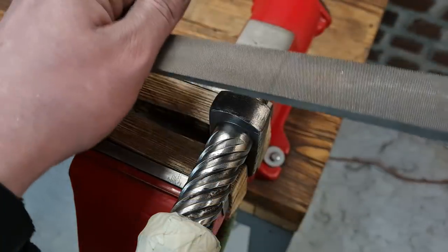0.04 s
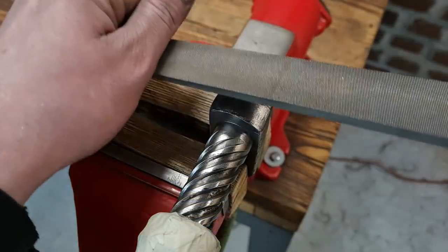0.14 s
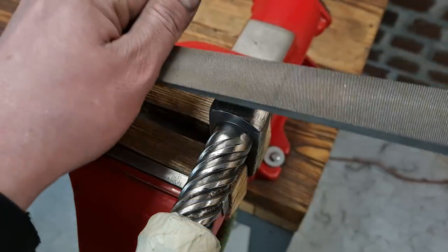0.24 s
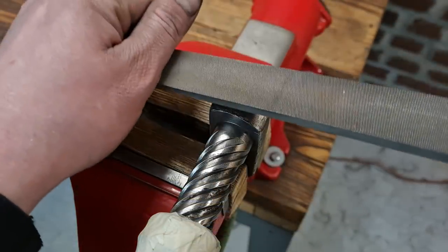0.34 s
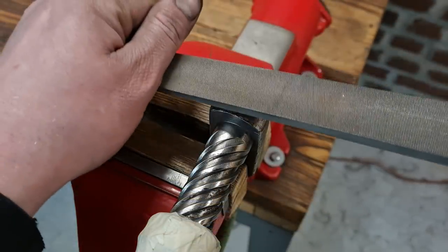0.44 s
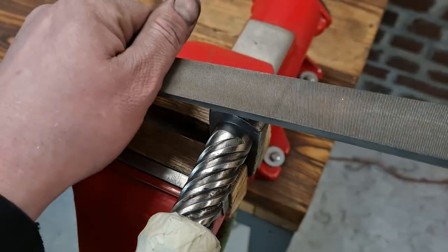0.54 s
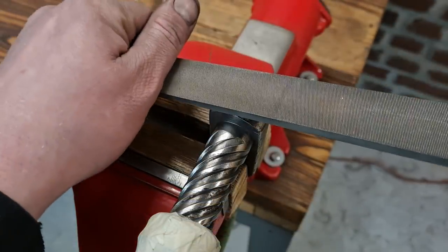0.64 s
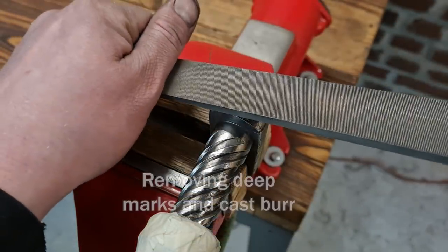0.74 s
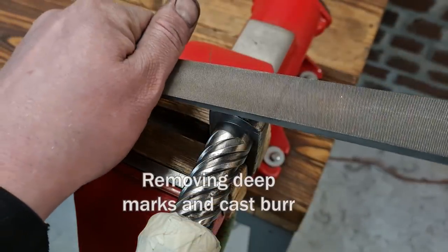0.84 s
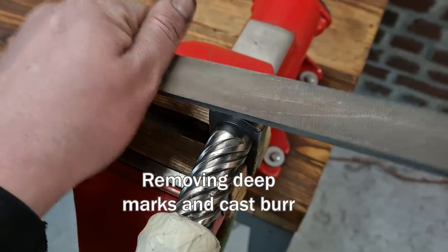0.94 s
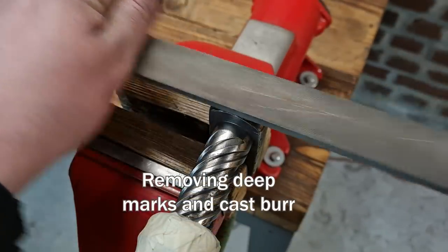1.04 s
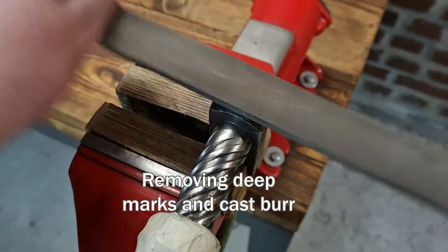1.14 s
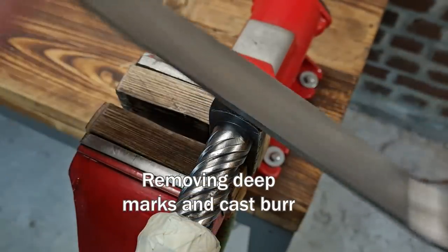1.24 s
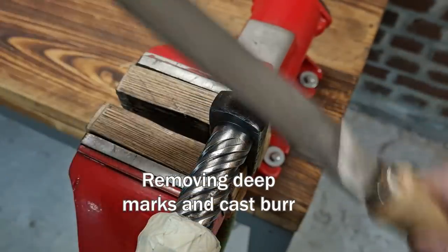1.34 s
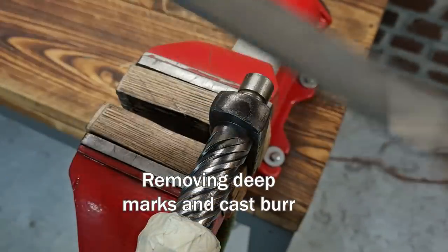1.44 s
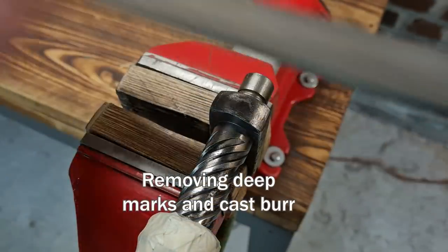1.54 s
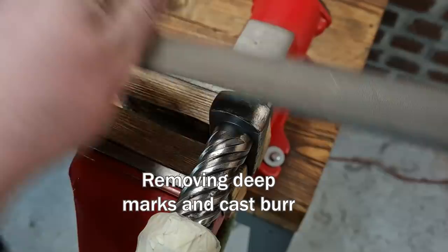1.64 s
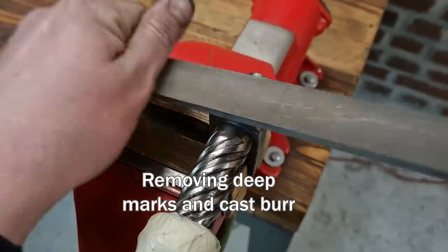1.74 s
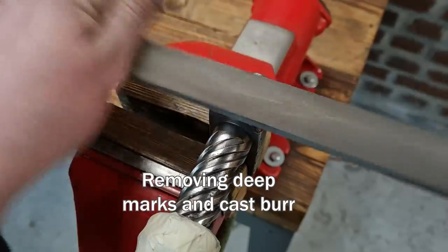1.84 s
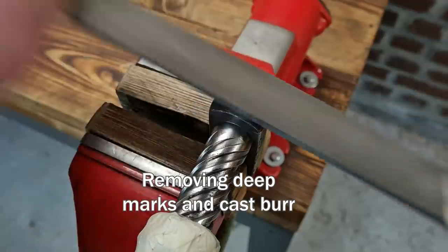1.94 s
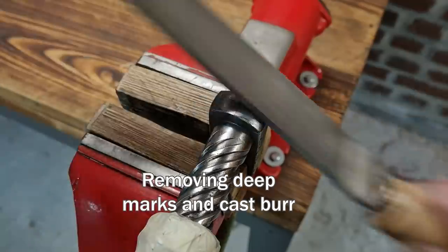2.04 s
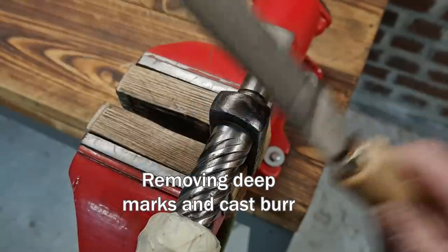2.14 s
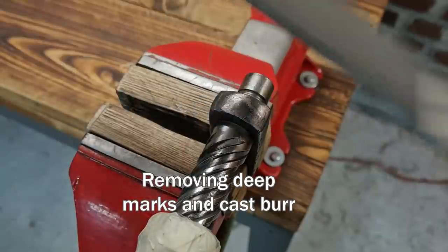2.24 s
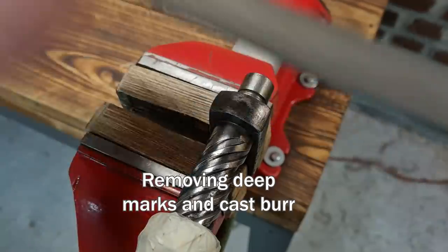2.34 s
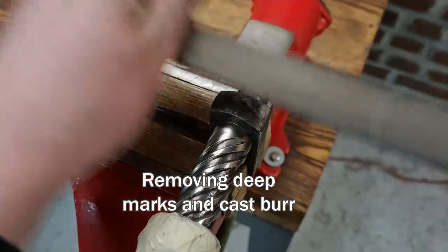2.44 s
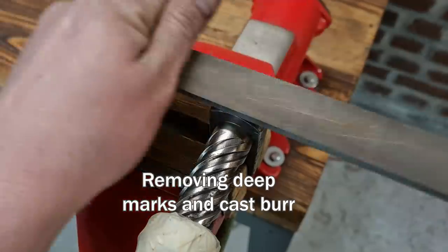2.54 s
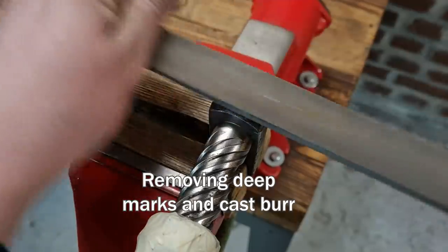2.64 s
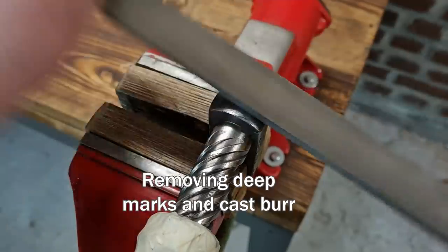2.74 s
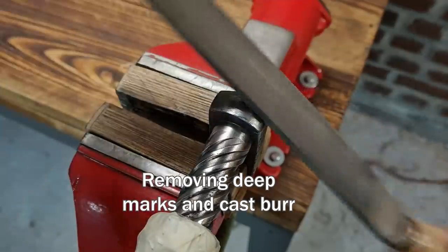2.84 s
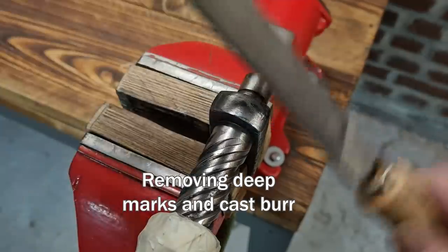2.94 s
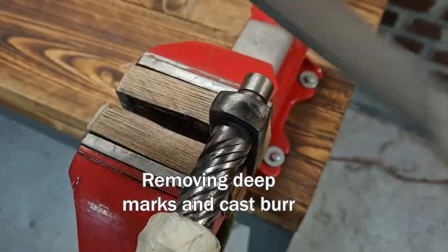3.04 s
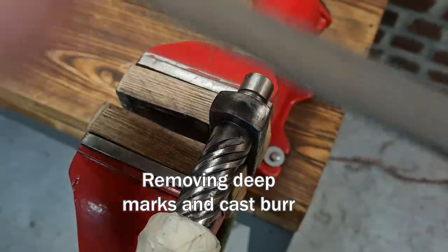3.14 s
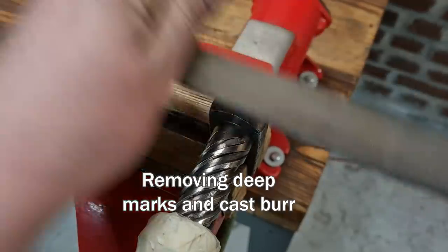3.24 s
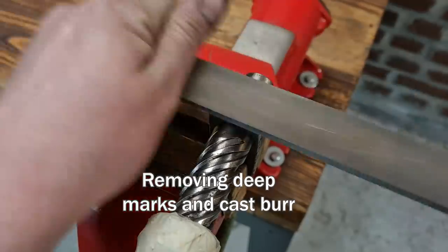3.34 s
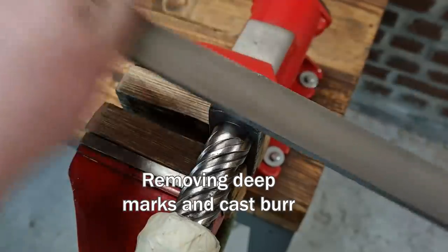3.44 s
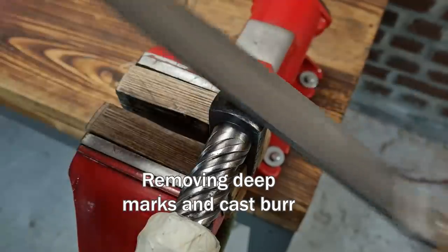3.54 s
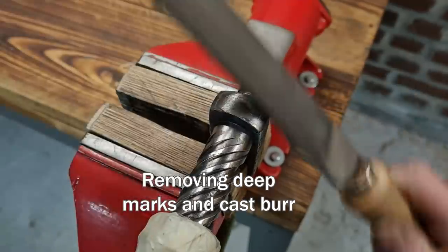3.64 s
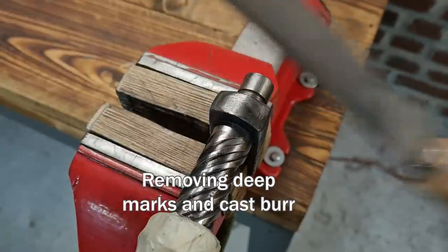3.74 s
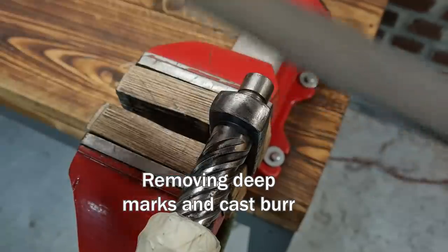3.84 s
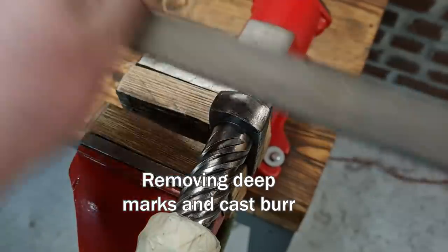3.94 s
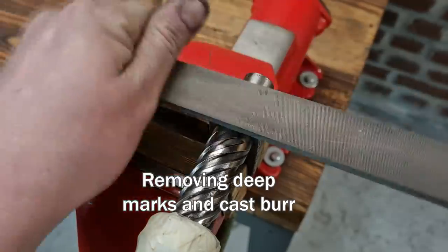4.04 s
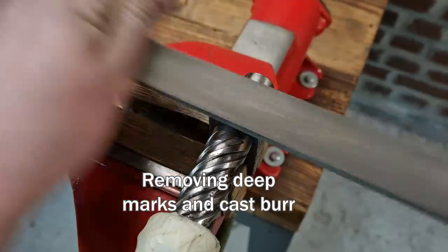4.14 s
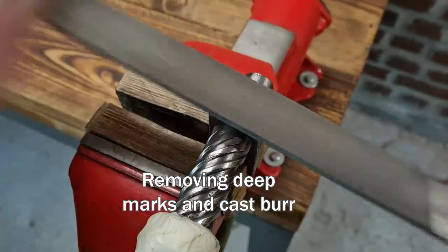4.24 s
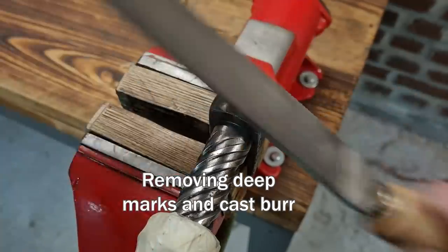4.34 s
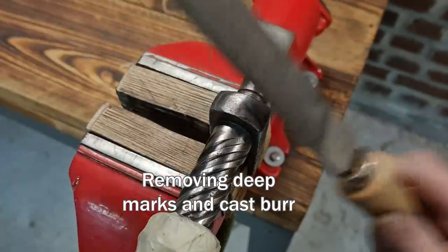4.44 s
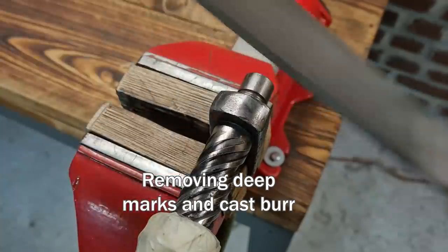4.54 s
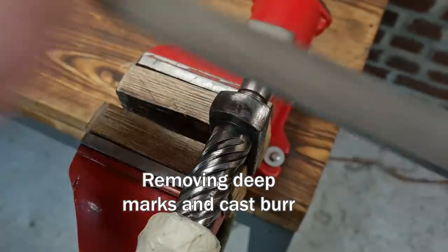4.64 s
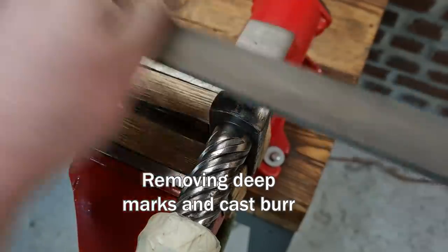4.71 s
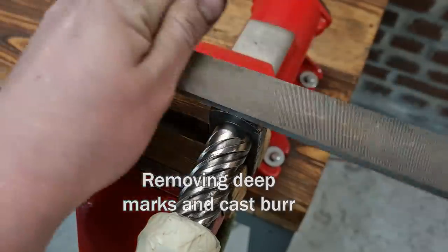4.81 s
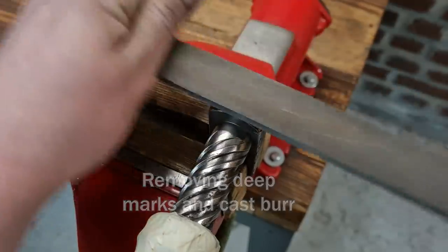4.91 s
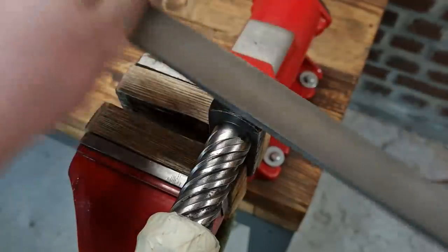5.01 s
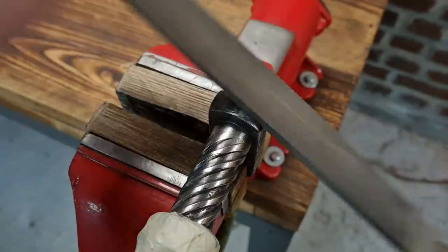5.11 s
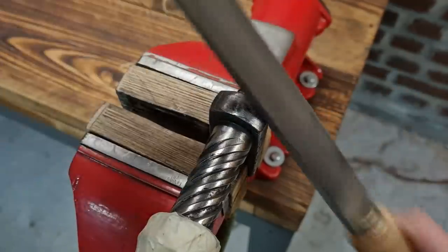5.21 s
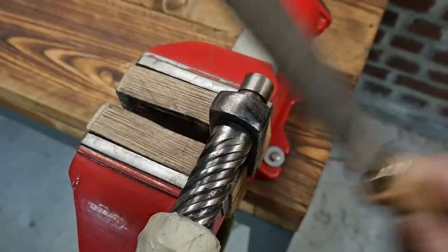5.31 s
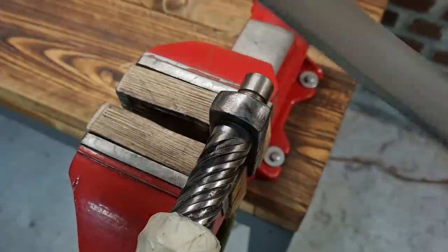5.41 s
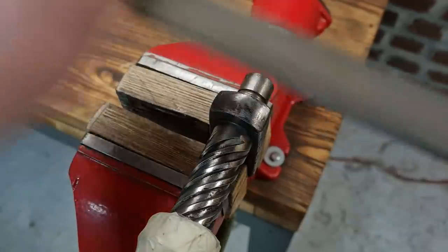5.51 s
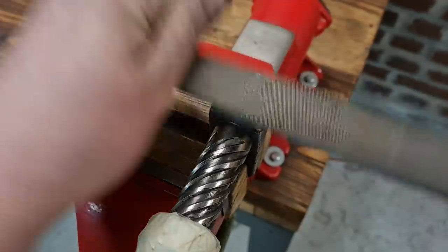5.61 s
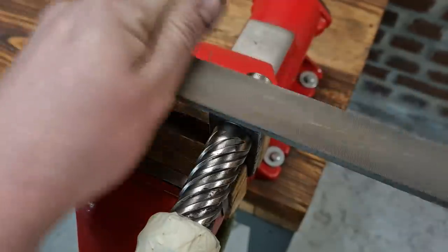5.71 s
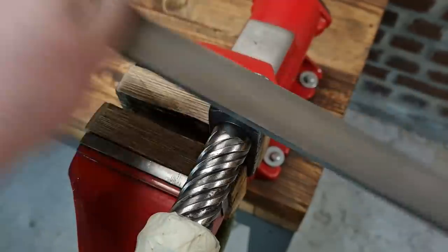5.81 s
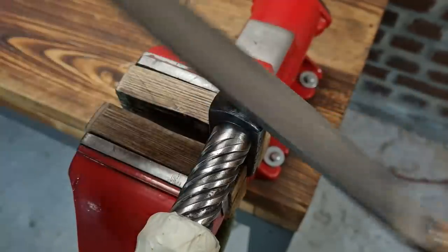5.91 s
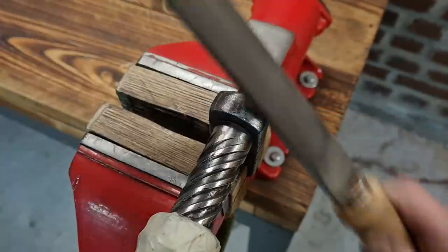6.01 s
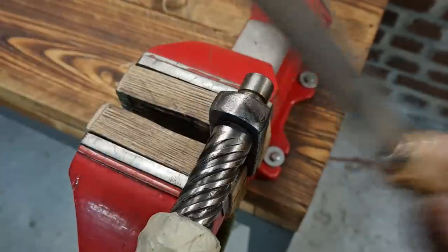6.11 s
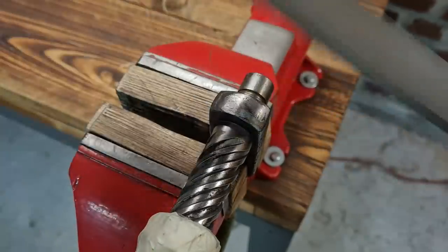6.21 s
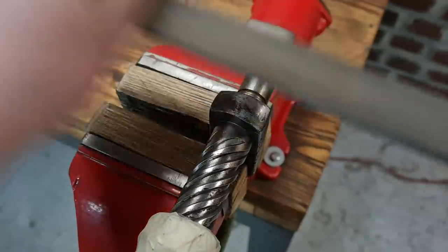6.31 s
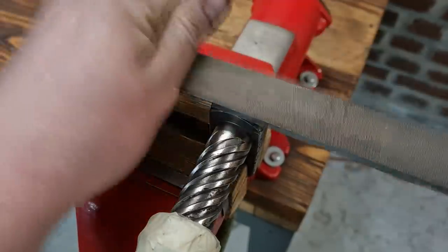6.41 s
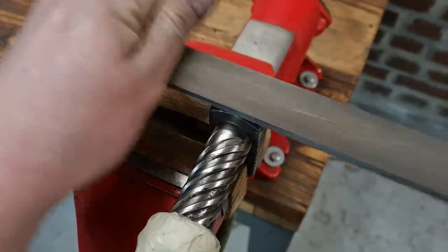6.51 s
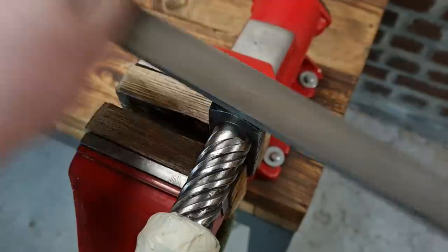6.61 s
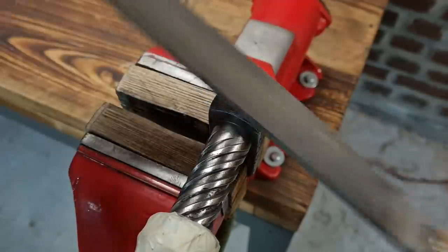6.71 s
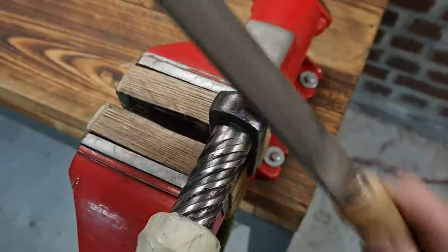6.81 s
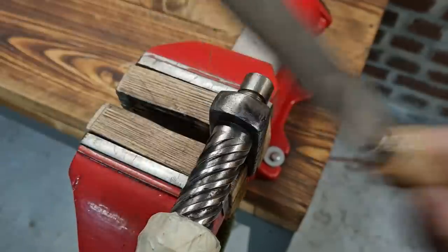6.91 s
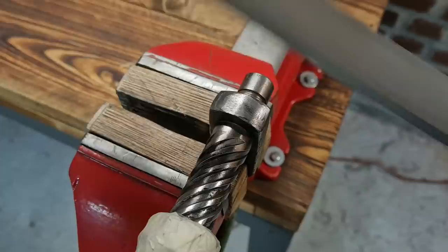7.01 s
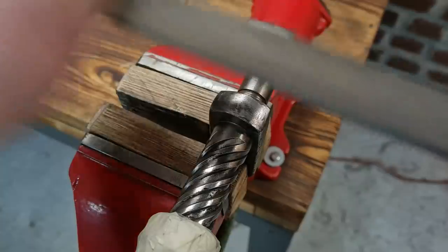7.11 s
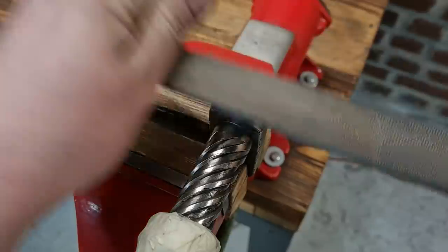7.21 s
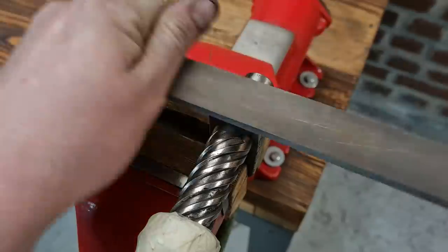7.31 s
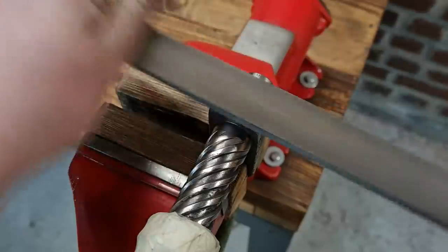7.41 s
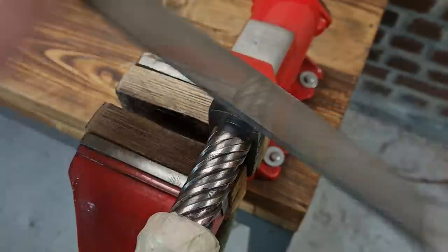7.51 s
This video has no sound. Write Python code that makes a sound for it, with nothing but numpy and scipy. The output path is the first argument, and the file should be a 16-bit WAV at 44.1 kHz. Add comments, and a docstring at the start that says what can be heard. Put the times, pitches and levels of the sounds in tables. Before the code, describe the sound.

Nine gritty filing strokes on steel in a bench vise, most starting with a hard metallic clack, with short gaps and a faint room tail.

```python
"""In a small workshop, a flat hand file works a steel part held between wooden jaws in a bench vise.
The file is set down, then stroked nine times: each later stroke lands with a sharp clack (noise and damped sines).
Forward strokes rasp: tooth-modulated noise drives resonances of bench, part and blade, plus a hiss of chips.
As the contact travels along the blade at an even pace, bending-wave nodes sweep dark notches down through
the rasp while its resonances climb; after each lift-off the file rings on, and the room answers."""
import sys
import numpy as np
from scipy import signal
from scipy.fft import rfft, irfft, next_fast_len
from scipy.io import wavfile
from scipy.ndimage import uniform_filter1d, map_coordinates

SR = 44100
rng = np.random.default_rng(int(sys.argv[2]) if len(sys.argv) > 2 else 0)


def wav_out(sig):
    """Save sig, one row per channel (or a flat mono array), as 16-bit PCM at SR to the path in sys.argv[1]."""
    wavfile.write(sys.argv[1], SR, np.round(np.clip(np.atleast_2d(sig).T, -1, 1) * 32767).astype(np.int16))


N = 333396
TIME = np.arange(N) / SR


def amp(db):
    """Decibels to gain."""
    return 10 ** (np.asarray(db) / 20)


def unit(x):
    """Scale to rms 1."""
    return x / np.sqrt(np.mean(x ** 2) + 1e-20)


def along(points, hz):
    """Interpolate (f/Hz, value) points on a log frequency axis."""
    f, value = np.transpose(points)
    return np.interp(np.log(hz + 1), np.log(f + 1), value)


def fade(t, t60):
    """Exponential decay by 60 dB in t60 seconds."""
    return np.exp(-np.log(1000) * t / t60)


def swell_at(s, span):
    """A smooth bump around s seconds, down to 1/e at span seconds either side."""
    return np.exp(-((TIME - s) / span) ** 2)


def wobble(rate):
    """A smooth random curve with rate knots a second."""
    knots = rng.standard_normal(int(N * rate / SR) + 4)
    return map_coordinates(knots, [TIME * rate])


def filtered(x, response, keep_power=False):
    """Filter x by a complex response of frequency, optionally normalised to equal power for white noise."""
    size = next_fast_len(N + SR // 2)
    h = response(np.fft.rfftfreq(size, 1 / SR))
    if keep_power:
        h = h / np.sqrt(np.mean(abs(h) ** 2))
    return irfft(rfft(x, size) * h, size)[..., :N]


def coloured(x, spectrum):
    """Give white sound a spectrum at equal power."""
    return filtered(x, lambda hz: amp(along(spectrum, hz)), True)


def resonate(x, modes):
    """Drive parallel (f/Hz, width/Hz, level/dB) resonances of alternating sign at equal power."""
    def response(f):
        total = 0
        for k, (centre, width, db) in enumerate(modes):
            band = 1j * f * width / (centre * centre - f * f + 1j * f * width)
            total = total + (-1) ** k * amp(db) * band
        return total
    return filtered(x, response, True)


def ring(modes, t, scatter_db):
    """Sum damped sines, with new strengths and signs for every blow."""
    hz, db, t60 = np.transpose(modes)[:, :, None]
    sign = rng.choice([-1, 1], hz.shape)
    size = sign * amp(db + scatter_db * rng.standard_normal(hz.shape))
    return np.sum(size * np.sin(2 * np.pi * hz * t) * fade(t, t60), axis=0)


def add(track, s, sound):
    """Mix a sound into a track at s seconds."""
    part = track[..., round(s * SR):][..., :sound.shape[-1]]
    part += sound[..., :part.shape[-1]]


# spectrum of the workshop hush: (f/Hz, relative level/dB)
HUSH = [(25, -6.5), (60, -10.5), (150, -12), (320, 1.5), (800, -27), (1500, -17.5), (4000, -28.5),
        (6500, -19), (16000, -29.5)]


def workshop_hush(level_db=-79.0):
    """Steady coloured noise, partly shared by both microphones."""
    shared = rng.standard_normal(N)
    return amp(level_db) * coloured(shared + .5 * rng.standard_normal((2, N)), HUSH)


# decay of the workshop: (f/Hz, t60/s before the early boost)
WORKSHOP = [(60, 0.93), (250, 0.64), (700, 0.45), (1500, 0.36), (4000, 0.31), (8000, 0.32), (15000, 0.24)]


def room(x, gap=.006, early_db=9, early_s=0.0044):
    """Bench top and near walls answer first; each stroke gets its own diffuse, frequency-dependent tail."""
    out = np.zeros((2, N))
    # a new tail takes over 30 ms before each stroke
    edges = [0] + [round((stroke[0] - .03) * SR) for stroke in STROKES] + [N]
    for a, b in zip(edges, edges[1:]):
        hz, t, z = signal.stft(rng.standard_normal((2, SR)), SR, nperseg=256)
        z[1] = np.where(hz[:, None] < 300, z[0], z[1])  # long waves reach both microphones alike
        early = amp(early_db * np.exp(-t / early_s))
        shape = fade(t, along(WORKSHOP, hz)[:, None]) * early
        tail = signal.istft(z * shape, SR, nperseg=256)[1]
        tail = tail / np.linalg.norm(tail[0])
        add(out, a / SR + gap, signal.fftconvolve(x[None, a:b], tail, axes=1))
    return out


# small ticks as the file is set in place: (t/s, relative level/dB)
TICKS = [(.197, -46), (.299, -41), (0.632, -39.5), (.659, -43.5), (.681, -41.5)]


def ticks(tick_db=-8, t60=0.03, low_hz=1800, high_hz=7000):
    """Single teeth catch: short decaying noise bursts, thinned below low_hz and softened above high_hz."""
    out, t = np.zeros(N), np.arange(SR // 10) / SR
    for s, db in TICKS:
        add(out, s, amp(db + tick_db) * fade(t, t60) * rng.standard_normal(len(t)))
    return filtered(out, lambda hz: (1j * hz / (low_hz + 1j * hz)) ** 2 / (1 + 1j * hz / high_hz))


# the vise taking the weight of the hand: (f/Hz, relative level/dB per Hz)
GRUMBLE = [(120, -29), (240, -2), (330, -4), (480, -17), (700, -13), (1200, -46.5), (4000, -70)]


def settling(scratch_db=-75, grain_db=4, rock_db=-49, rock_s=.64, rock_span=0.033):
    """The resting file creeps with a faint gritty hiss; the weight of the hand makes the vise grumble."""
    grit = unit(rng.standard_normal(N) * amp(grain_db * wobble(140)))
    grumble = amp(rock_db) * swell_at(rock_s, rock_span) * coloured(grit, GRUMBLE)
    hiss = coloured(grit, RASP) + coloured(grit, FIZZ) / 2
    return amp(scratch_db) * swell_at(0.82, 0.25) * hiss + grumble


# the file ringing in the air: (f/Hz, relative level/dB before scatter, t60/s)
FREE_FILE = [(124.8, -11.5, .5), (534, -12, 0.27), (561, -5.5, 0.33), (700, -2, 0.13), (729, -4, 0.36),
             (1505, -7.5, 0.17), (1560, -8, .22), (1710, -15.5, 0.12)]


def lift_offs(free_db=-2, swell=0.0064, flutter=0.46):
    """Freed from the part, the file rings on by itself, fluttering as it swings through the air."""
    out, t = np.zeros(N), np.arange(SR) / SR
    for _, lift, *_, db in STROKES:
        tone = ring(FREE_FILE, t, scatter_db=6) * (1 - np.exp(-t / swell))
        add(out, lift, amp(db + free_db) * tone)
    return out * unit(1 + flutter * wobble(90))


# the file lands on the part: (t/s, crack and blade level/dB, vise ring level/dB, jaw thud level/dB,
# brightness/dB per octave, hardness of the crack/dB, blade tuning factor, ring time factor); levels relative
TOUCHES = [(0.5346, -12, -44.5, -37.5, -8, -9, 1.003, 0.84), (1.739, -4, -32.5, -31.5, 5.5, 9, 0.96, 1.2),
           (2.536, -7.5, -32, -33.5, -3, -7.5, 0.99, .9),
           (3.3152, -6.5, -35.5, -33.5, -1, -8.5, 1.033, 1.03),
           (4.0701, -7.5, -30.5, -28, -1.5, 0, 1.06, 0.95), (4.8239, -7, -33.5, -34.5, -6.5, -15, 1, 0.83),
           (5.6641, -5.5, -32, -28.5, 3, -2.5, 1.03, 1.2), (6.4476, -6, -31, -29.5, 3.5, -5.5, 1.023, 1.23),
           (7.2813, -8.5, -36, -30.5, -0.5, -9.5, 1.03, 1.02)]
# the blade under a blow, before each landing's tuning and hardness: (f/Hz, relative level/dB, t60/s)
BLADE = [(1334, -8.5, 0.0033), (2250, 5, 0.012), (2800, 0.5, 0.0079), (3130, 0, 0.006), (3550, -0.5, 0.012),
         (4070, -0.5, 0.014), (4580, -1, 0.019), (5050, -1, 0.013), (5600, 1, 0.0088), (6100, -2, 0.01),
         (6916, -6, 0.027), (7630, -12, 0.023), (8180, -18, 0.023), (10800, -19, 0.022),
         (12540, -18, 0.014)]
# the vise under a blow: (f/Hz, relative level/dB before scatter, t60/s)
VISE = [(127.6, -13, 0.43), (236, -14, 0.16), (271, -7.5, 0.47), (311, -3.5, 0.38), (345, -1, 0.65),
        (595, -7.5, 0.12), (1230, -7, 0.064), (1403.4, 11.5, 0.16), (2340, -23, 0.053), (3670, -10, 0.064),
        (4750, -11, 0.24)]
# thud of the wooden jaws: (f/Hz, relative level/dB per Hz)
JAWS = [(40, -10), (120, -13), (300, -2), (440, -10), (620, -2), (850, -8), (1400, -5), (2000, -13),
        (6000, -50.5)]
CRACK_HZ = 7800  # above this, hardness sets the level of a blade mode; below, brightness does
CLAMP_S, RING_LEFT = 0.0029, 0.83  # pressed on the part, the blade quickly drops to this share of its ring


def blade_modes(bright_db, hard_db, tuning, loose):
    """Where the file lands on the part shifts and damps the blade; the hardness of the landing drives its
    highest modes."""
    modes = []
    for hz, level, t60 in BLADE:
        tilt_db = hard_db if hz > CRACK_HZ else bright_db * np.log2(hz / 4000)
        modes.append((hz * tuning, level + tilt_db, t60 * loose))
    return modes


def clacks(clack_db=1.5, thud_t60=0.26, crack=0.57, crack_t60=0.0093, swell=0.0033, rise=0.00025,
           sizzle=0.13, sizzle_t60=0.064):
    """Steel on steel cracks in the damped blade, whose many weak modes sizzle; vise rings, jaws thud."""
    blade, dense = np.zeros((2, 2, N))  # noise differs at each microphone
    vise, thud = np.zeros((2, N))
    t = np.arange(SR // 2) / SR
    clamp = RING_LEFT + (1 - RING_LEFT) * np.exp(-t / CLAMP_S)
    for s, db, ring_db, thud_db, bright_db, hard_db, tuning, loose in TOUCHES:
        modes = blade_modes(bright_db, hard_db, tuning, loose)
        snap = crack * amp(hard_db) * fade(t, crack_t60) * rng.standard_normal((2, len(t)))
        blow = (ring(modes, t, scatter_db=2.5) + snap) * clamp * (1 - np.exp(-t / rise))
        add(blade, s, amp(db + clack_db) * blow / abs(blow).max())
        sizzle_fade = fade(t, crack_t60) + fade(t, sizzle_t60 * loose) / 10
        add(dense, s, amp(db) * sizzle * sizzle_fade * rng.standard_normal((2, len(t))))
        onset = 1 - np.exp(-t / swell)
        tone = ring(VISE, t, scatter_db=0.5)
        add(vise, s, amp(ring_db) * onset * tone / tone[:SR // 20].std())
        add(thud, s, amp(thud_db) * onset * fade(t, thud_t60) * rng.standard_normal(len(t)))
    return blade + coloured(dense, RASP), vise + coloured(thud, JAWS)


# the teeth lock on to a resonance of the part: (t/s, half length/s, f/Hz at t, glide/Hz per s,
# relative level/dB)
CHATTER = [(1.262, 0.019, 1168, 98.6, -27), (1.288, 0.029, 1578, 302, -28),
           (2.093, 0.024, 1562, 900, -24.5), (2.793, 0.074, 535, 39.8, -25), (3.442, 0.025, 1395, 900, -22),
           (3.626, 0.03, 1533, 401, -28), (5.24, 0.029, 1548, 1197, -29), (5.852, 0.051, 633, 1320, -29),
           (6.827, 0.021, 1533, 1210, -28)]


def chatter(chatter_db=-2, waver=0.64):
    """Brief wavering sine hums of the part that bend upward as the file moves on."""
    hums = np.zeros(N)
    for s, span, hz, glide, db in CHATTER:
        t = TIME - s
        phase = 2 * np.pi * (hz + glide * t / 2) * t + waver * wobble(80)
        hums += amp(db) * swell_at(s, span) * np.sin(phase)
    return amp(chatter_db) * hums


# forward strokes: (start t/s, lift-off t/s, contact at start/m from the tip, contact at lift-off/m,
# hardest push as share of the stroke, force build-up/dB, bench shudder level/dB, bite level/dB,
# rasp level/dB, chips level/dB, freed-file ring level/dB); levels relative, the four drives at the
# hardest push before travel and grab
STROKES = [(0.973, 1.352, .04, 0.14, 0.89, 12.6, -35.5, -28.5, -34, -31, -49.5),
           (1.739, 2.126, 0.004033, .18, 0.77, 14, -35.5, -29, -31.5, -29.5, -38),
           (2.541, 2.932, .054, 0.19, 0.88, 3.8, -37, -32.5, -38, -35.5, -38.5),
           (3.317, 3.661, .034, 0.22, 0.77, 5.1, -34, -30, -32, -31, -39.5),
           (4.067, 4.394, .044, 0.21, 0.51, 10.7, -36.5, -29.5, -29.5, -30.5, -33),
           (4.829, 5.259, .056, 0.19, 0.92, 14.7, -35, -31, -37, -36.5, -34),
           (5.664, 6.023, .038, .206, 0.89, 1.6, -34.5, -30.5, -36, -35, -30),
           (6.45, 6.835, .032, 0.22, 0.986, 4.6, -36.5, -32, -37, -36.5, -36.5),
           (7.283, 7.664, .05, 0.21, 0.61, 7.3, -37.5, -32, -39.5, -38, -53)]
EASE_DB_PER_S = 68  # the hand slackens after its hardest push
SHUDDER_FOLLOWS, BITE_FOLLOWS = 0.097, 0.48  # dB for each dB of force
BITE_TRAVEL_DB_PER_M, FIZZ_TRAVEL_DB_PER_M = 25.5, 67  # growth as the contact leaves the tip
MID_BLADE_M = 0.16  # where that growth counts as 0 dB
GRAB_DB, GRABS_PER_S = 0.93, 22  # the teeth grab and slip unevenly
PICK_UP_S = 0.06  # bite and chips start weaker for about this long
BITE_SLOW_DB, FIZZ_SLOW_DB = 7.5, 13.5  # how much weaker they are at the start


def motion(grip=0.029, release=0.015):
    """Contact place, even stroke speed and four drive gains: the hand leans in, slackens and lifts."""
    place, speed, drive = np.zeros(N), np.zeros(N), np.zeros((4, N))
    grab_db = GRAB_DB * wobble(GRABS_PER_S)
    for start, lift, near, far, hardest, build_db, shudder_db, bite_db, rasp_db, chips_db, _ in STROKES:
        u = np.clip((TIME - start) / (lift - start), 0, 1)  # share of the stroke done
        path = near + (far - near) * u
        begun = TIME >= start
        place[begun], speed[begun] = path[begun], np.gradient(path)[begun] * SR
        contact = np.clip((TIME - start) / grip, 0, 1) * np.exp(-np.maximum(TIME - lift, 0) / release)
        lean_in_db = -build_db * np.maximum(1 - u / hardest, 0)
        ease_db = EASE_DB_PER_S * (lift - start) * np.maximum(u - hardest, 0)
        force_db = lean_in_db - ease_db
        travel, slow = path - MID_BLADE_M, swell_at(start, PICK_UP_S)
        bite_move_db = BITE_TRAVEL_DB_PER_M * travel - BITE_SLOW_DB * slow
        chips_move_db = FIZZ_TRAVEL_DB_PER_M * travel - FIZZ_SLOW_DB * slow
        drive += contact * amp([shudder_db + SHUDDER_FOLLOWS * force_db,
                                bite_db + BITE_FOLLOWS * force_db + bite_move_db,
                                rasp_db + force_db,
                                chips_db + force_db + chips_move_db])
    return place, speed, drive * amp(grab_db)


def teeth(speed, tooth_m=.00078, unsteady=0.06035, bite=0.45, snag_db=2):
    """Tearing noise of rms 1 that surges as each row of teeth meets the edge."""
    rows = np.cumsum(speed * (1 + unsteady * wobble(150))) / tooth_m / SR
    surge = np.cos(2 * np.pi * rows) * (speed > 0)
    tearing = unit(rng.standard_normal(N) * np.exp(bite * surge) * amp(snag_db * wobble(120)))
    return tearing, surge


# low bending modes of the span between contact and handle: (f/Hz with the contact at the tip,
# half width/octaves, relative level/dB)
SPAN_MODES = [(451, 0.13, -1.5), (1076, .12, -1.5)]


def climbing(x, place, blade_m=.7, stiffening=1.4):
    """The low modes of the blade glide upward as the span between contact and handle shortens."""
    hz, t, z = signal.stft(x, SR, nperseg=1024)
    span_m = np.maximum(blade_m - np.interp(t, TIME, place), blade_m / 10)
    rise = (blade_m / span_m) ** stiffening
    gain = 0
    for tip_hz, octaves, db in SPAN_MODES:
        away = np.log2((hz[:, None] + 1) / (tip_hz * rise)) / octaves
        gain = gain + amp(db) * np.exp(-away ** 2)
    return unit(signal.istft(z * gain, SR, nperseg=1024)[1][:N])


# depth of the sweeping notches: (f/Hz, peak-to-node depth/dB)
NOTCHES = [(2000, 1), (3200, 11), (5500, 8), (8000, 5), (15000, 2)]
WAVE_M = 6.73  # length of a bending wave of 1 Hz in the blade


def standing_waves(x, place, patchy_db=3.0, blade_m=.7, tip_hz=2250, octaves=0.15, climb_db=7.5):
    """A bending wave, WAVE_M / sqrt(Hz) long, is driven less when the contact sits on its node."""
    hz, t, z = signal.stft(x, SR, nperseg=256)
    contact = np.interp(t, TIME, place)
    half_waves = 2 * contact * np.sqrt(hz)[:, None] / WAVE_M
    on_node = np.cos(np.pi * np.maximum(half_waves, .5)) ** 4  # no node at the tip
    nodes_db = along(NOTCHES, hz)[:, None] * (3 / 8 - on_node)  # 3/8 is the mean of cos^4
    # the span between contact and handle shortens, so its resonance climbs and grows
    span_hz = tip_hz * (blade_m / np.maximum(blade_m - contact, blade_m / 10)) ** 2
    away = np.log2((hz[:, None] + 1) / span_hz) / octaves
    span_db = climb_db * np.minimum(contact / MID_BLADE_M, 1) * np.exp(-away ** 2)
    # it fades as the pressure comes off
    span_db = span_db * sum(np.clip((lift - t) / 0.054, 0, 1) * (t > start) for start, lift, *_ in STROKES)
    # uneven patches of loudness in the noise
    patches = uniform_filter1d(rng.standard_normal(z.shape), size=5, axis=0)
    patches = unit(uniform_filter1d(patches, size=16, axis=1))
    gain = amp(nodes_db + span_db + patchy_db * patches)
    return unit(signal.istft(z * gain, SR, nperseg=256)[1][:N])


# the file drags and the bench judders: (t/s, half length/s, f/Hz, width/Hz, relative level/dB)
JUDDER = [(4.28, 0.12, 125, 4.5, -38.5), (4.93, .07, 69, 37, -33.5), (6.735, 0.033, 116.3, 21, -32),
          (6.73, 0.071, 54, 18, -38)]


def judder():
    """Swells of noise shake single low resonances of the bench."""
    drag = np.zeros(N)
    for s, span, hz, width, db in JUDDER:
        drag += resonate(amp(db) * swell_at(s, span) * rng.standard_normal(N), [(hz, width, 0)])
    return drag


# resonances of the bench: (f/Hz, width/Hz, relative level/dB)
BENCH = [(60.3, 10, 0.5), (81.5, 14, -8.5), (124.7, 12, -1.5), (170.5, 6.5, -9), (221.1, 14, 1),
         (243, 13, -1.5), (266.4, 14, 2), (310, 15, -3), (338.8, 25, -5)]
# resonances of the clamped part with the file on it: (f/Hz, width/Hz, relative level/dB)
PART = [(471, 2.6, -7), (540.7, 24, 2), (591, 49, 1), (664, 89.4, -1), (731.6, 50, -2), (811.3, 59, -3),
        (843, 55, -3.5), (1171.3, 25, 3.5), (1365, 270, -9), (1402, 64, 2), (1533.5, 29, 3),
        (1589, 43, -1.5)]
# the file brushes the part softly near the start of a stroke: (t/s, half length/s, relative level/dB)
GRAZES = [(0.976, 0.018, -56), (7.251, 0.016, -55.5)]
# spectrum of the rasping blade: (f/Hz, relative level/dB per Hz)
RASP = [(700, -13.5), (1000, -1.5), (1800, 0), (2300, 0.5), (3600, -5), (5400, -3), (6600, -14.5),
        (7000, -7), (7500, -6.5), (8200, -26), (9200, -41.5), (12000, -59.5)]
# spectrum of the hissing chips: (f/Hz, relative level/dB per Hz)
FIZZ = [(6000, -41.5), (8000, -1.5), (8700, -0.5), (9150, -13.5), (9900, -1), (10900, 1), (11600, -3.5),
        (12500, 3), (13300, 1), (14400, -7), (15100, 0), (16000, -13)]


def filing(bench_db=-4.0, part_db=-3.0, span_db=-8, rasp_db=-1.0, fizz_db=-8, tooth_tone=0.066, flicker_db=1.0):
    """The teeth shake bench and part, make the blade growl and hiss, and tear off fine chips."""
    place, speed, (shudder, bite, rasp, fizz) = motion()
    tearing, surge = teeth(speed)
    bench = amp(bench_db) * resonate(shudder * tearing, BENCH) + judder()
    brush = sum(amp(db) * swell_at(s, span) for s, span, db in GRAZES)
    part = resonate((amp(part_db) * bite + brush) * (tearing + tooth_tone * surge), PART)
    growl = amp(span_db) * bite * climbing(teeth(speed)[0], place)
    flicker = unit(amp(flicker_db * wobble(100)))  # the level of rasp and hiss flickers unevenly
    blade = amp(rasp_db) * coloured(rasp * flicker * standing_waves(tearing, place), RASP)
    # the shortest waves leave the blade differently towards each microphone
    hiss = np.array([standing_waves(teeth(speed)[0], place) for _ in range(2)])
    chips = amp(fizz_db) * coloured(fizz * flicker * hiss, FIZZ)
    return bench, part + growl + chatter() + lift_offs(), blade, chips


def heard(x, lag_s, lean):
    """Direct sound at two microphones: the left lags by lag_s; lean is (f/Hz, left-right level/dB)."""
    half = np.array([[.5], [-.5]])
    return filtered(x, lambda hz: amp(half * along(lean, hz)) * np.exp(-2j * np.pi * hz * lag_s * half))


# stereo lean of part, blade and clack: (f/Hz, left-right level/dB)
PART_LEAN = [(400, -8), (600, 6), (950, -6.5), (1300, 11), (1700, -0.5)]
BLADE_LEAN = [(1500, 1), (3200, -7.5), (7000, -13.5), (8000, -1.5), (15000, -9)]
CLACK_LEAN = [(1400, 8), (3000, -10.5), (7000, -11), (10000, -2.5)]


def scene():
    """The blade to the right, the part a little to the left, the workshop around them, and its faint hush."""
    bench, part, rasp, chips = filing()
    clack, vise = clacks()
    small = ticks() + settling()
    direct = bench + vise + chips
    direct = direct + heard(part, -.00012, PART_LEAN)
    direct = direct + heard(rasp + small, 0.0003, BLADE_LEAN)
    direct = direct + heard(clack, 0.00032, CLACK_LEAN)
    send = amp(-1.0) * (bench + vise) + part + amp(0.5) * rasp
    send = send + amp(-9.5) * chips[0] + amp(-5) * clack[0] + amp(-1.5) * small
    return direct + room(send) + workshop_hush()


def record(dry, low_hz=44, top_hz=16000):
    """A high-pass trims the deepest rumble; a very steep low-pass closes the band at top_hz."""
    trimmed = signal.sosfilt(signal.butter(4, low_hz, "high", fs=SR, output="sos"), dry)
    return filtered(trimmed, lambda hz: 1 / (1 + (hz / top_hz) ** 120))


dry = scene()
out = record(dry)
wav_out(out)
```